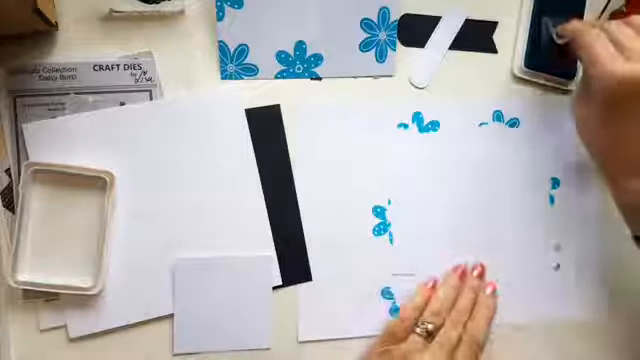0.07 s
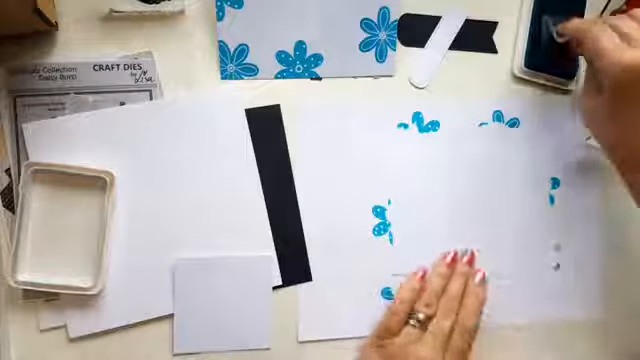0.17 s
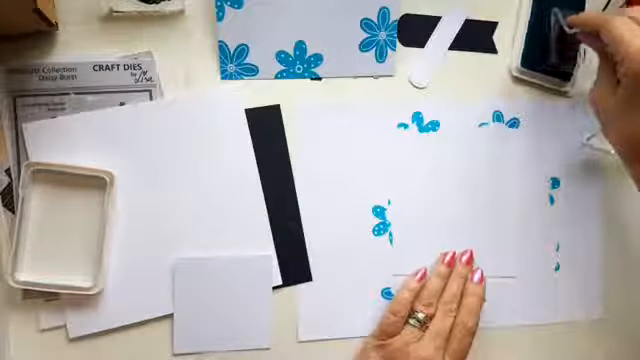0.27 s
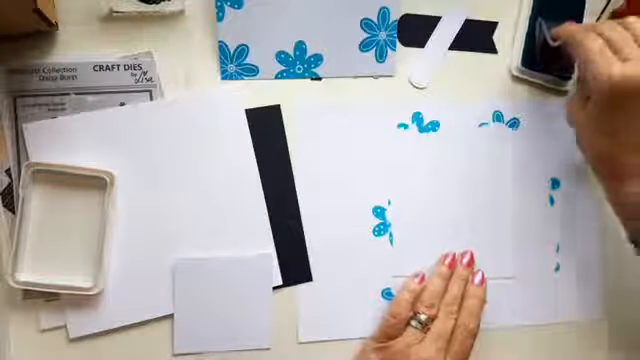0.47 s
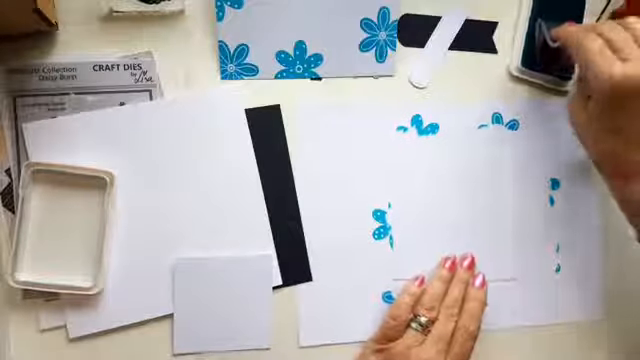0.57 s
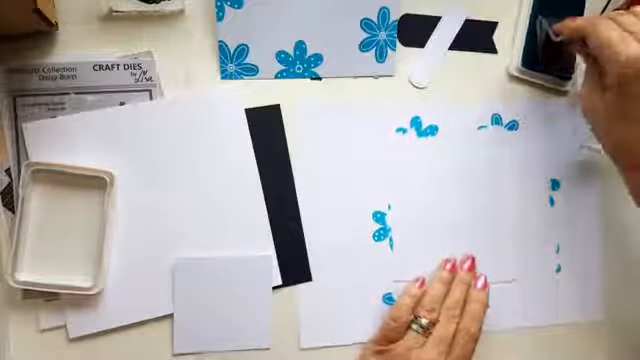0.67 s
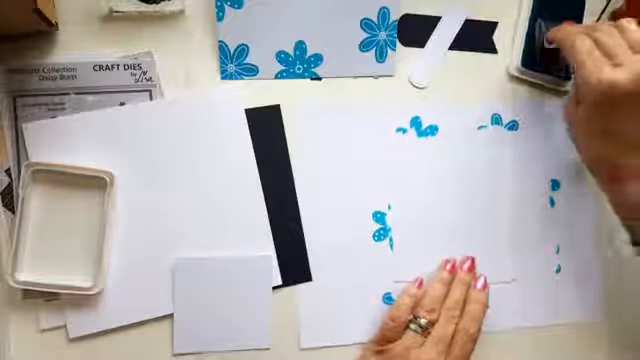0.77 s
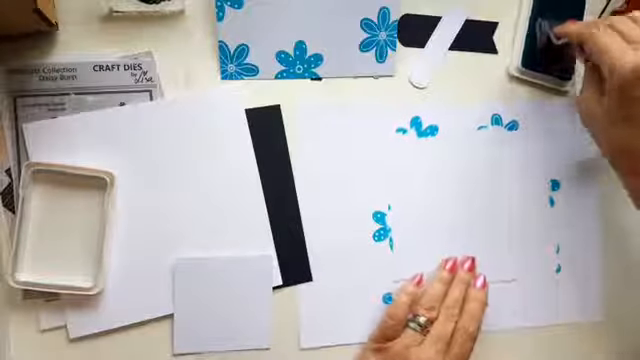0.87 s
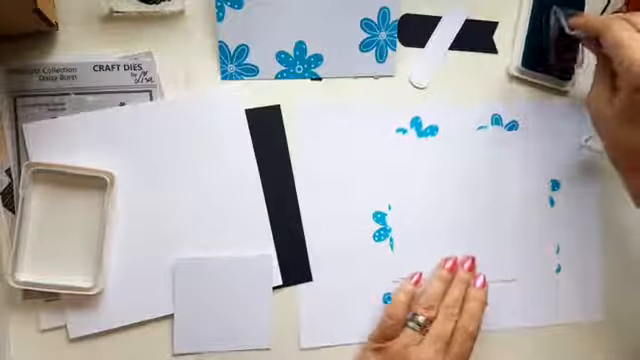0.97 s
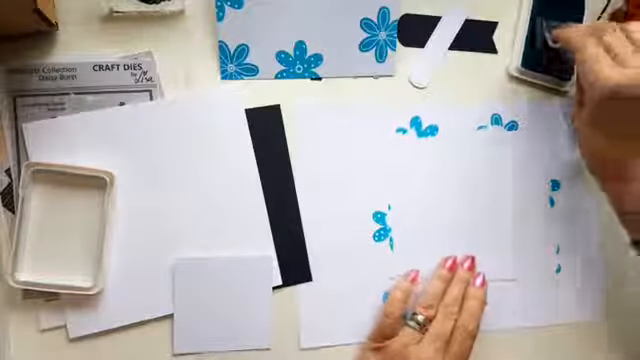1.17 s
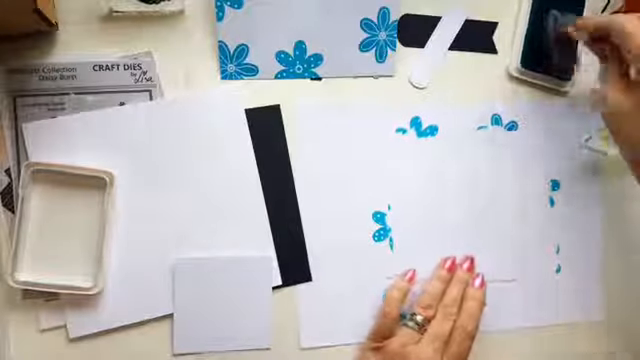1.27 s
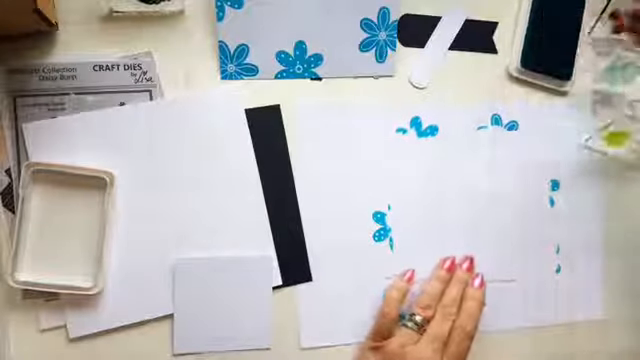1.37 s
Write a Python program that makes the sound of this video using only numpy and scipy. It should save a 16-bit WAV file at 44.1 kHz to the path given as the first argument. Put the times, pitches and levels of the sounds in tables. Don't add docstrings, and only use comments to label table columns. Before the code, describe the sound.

An acrylic stamp block knocks hard on a craft table, then two soft low thuds follow

```python
import sys
import numpy as np
from scipy import signal
from scipy.fft import rfft, irfft
from scipy.io import wavfile
from scipy.ndimage import uniform_filter1d

SR = 44100
rng = np.random.default_rng(int(sys.argv[2]) if len(sys.argv) > 2 else 0)


def inscribe(sig):
    pcm = np.round(np.clip(np.atleast_2d(sig).T, -1, 1) * 32767)
    wavfile.write(sys.argv[1], SR, pcm.astype(np.int16))


def how_loud(loudness_db):
    steps = np.asarray(loudness_db, float) / 20
    return 10 ** steps


N = 61739

# (time [s], crack level [dB], t60 [s])
EDGE_CONTACTS = [
    (.2286, -28, 0.029),
    (.2303, -30.5, 0.026),
    (.2336, -34.5, 0.018),
]


def read(points, hz):
    f, value = np.transpose(points)
    return np.interp(np.log(hz + 1), np.log(f + 1), value)


def evened(x):
    return x / np.sqrt(np.mean(x ** 2) + 1e-20)


def add(mix, s, sound):
    part = mix[round(s * SR):][:len(sound)]
    part += sound[:len(part)]


def coloured(points, size):
    hz = np.fft.rfftfreq(size, 1 / SR)
    spectrum = rfft(rng.standard_normal(size)) * how_loud(read(points, hz))
    return evened(irfft(spectrum, size))


def ring(hz, db, t60, length=.6):
    t = np.arange(round(length * SR)) / SR
    return how_loud(db - 60 * t / t60) * np.sin(2 * np.pi * hz * t)


def motor_bumps():
    per_s, width_s = 69, 0.0047
    at = np.cumsum(rng.uniform(0.36, 1.0, 200)) / per_s * SR
    train = np.zeros(N)
    train[at[at < N].astype(int)] = rng.exponential(1, 200)[at < N]
    u = np.arange(-3, 3, 1 / (width_s * SR / 2))
    pulse = -(1 - u ** 2 / 2) * np.exp(-u ** 2 / 2)
    return how_loud(-70) * signal.oaconvolve(train, pulse, "same")


def fizz():
    hz, width_hz, flicker_db = 7480, 1200, 3.5
    band = [(hz - 2 * width_hz, -40), (hz, 0), (hz + 2 * width_hz, -40)]
    flicker = how_loud(flicker_db * evened(uniform_filter1d(rng.standard_normal(N), size=400)))
    return how_loud(-90) * flicker * coloured(band, N)


def hush():
    # (frequency [Hz], density [dB])
    hush_colour = [(25, -1), (60, -9), (110, -1.5), (200, -3.5), (500, -11), (1500, -16.5), (5000, -26),
                   (9000, -32), (13500, -27.5)]
    return how_loud(-70) * coloured(hush_colour, N) + motor_bumps() + fizz()


def room(x):
    # (frequency [Hz], t60 [s])
    decay = [(200, 0.28), (600, 0.25), (1500, 0.2), (4000, .21), (8000, 0.19), (13000, 0.13)]
    gap_s, spacing = .004, 20
    taps = np.zeros(SR // 2)
    at = np.arange(0, SR // 2 - spacing, spacing)
    taps[at + rng.integers(0, spacing, len(at))] = rng.choice([-1., 1.], len(at))
    hz, t, z = signal.stft(taps, SR, nperseg=256)
    fading = how_loud(-60 * t / read(decay, hz)[:, None])
    tail = signal.istft(z * fading, SR, nperseg=256)[1]
    response = np.concatenate([np.zeros(round(gap_s * SR)), tail / np.linalg.norm(tail)])
    return signal.fftconvolve(x, response)[:N]


def slide():
    # (time [s], level [dB])
    stroke = [(.145, -108), (.165, -68.5), (.19, -69.5), (.2, -68), (.215, -85.5), (.225, -87)]
    # (frequency [Hz], level [dB])
    friction = [(200, 2.5), (1300, 0), (4000, -5.5), (7000, -9), (9500, -9.5), (13500, -9.5)]
    s, db = np.transpose(stroke)
    grain = how_loud(1.2 * evened(uniform_filter1d(rng.standard_normal(N), size=60)))
    return coloured(friction, N) * grain * how_loud(np.interp(np.arange(N) / SR, s, db))


def ticks():
    # (time [s], peak level [dB], resonance [Hz], t60 [s], treble level [dB])
    contacts = [(.1860, -51, 1370, 0.049, -49), (0.1915, -60, 603, 0.036, -37),
                (0.776, -74, 2480, 0.0073, -33), (.9208, -65, 2560, 0.019, -43),
                (.9577, -70.5, 4000, 0.027, -11), (0.999, -63, 3200, 0.037, -17),
                (.9985, -74, 6460, 0.018, -17), (1.2880, -52, 3200, 0.013, -24),
                (1.2882, -60.5, 5200, 0.013, -21), (1.2890, -56.5, 1500, 0.009, -30.5),
                (1.309, -76, 2315, 0.0078, -17), (1.3613, -66, 2500, 0.0084, -24)]
    out = np.zeros(N)
    t = np.arange(2048) / SR
    onset = np.minimum(t / 0.00051, 1)
    for s, db, hz, t60, treble_db in contacts:
        resonance = [(hz / 4, -20), (hz / 1.5, -6), (hz, 0), (hz * 1.2, -9), (14000, treble_db)]
        add(out, s, onset * how_loud(db - 60 * t / t60) * coloured(resonance, size=2048))
    return out


def whistle():
    hz, end_s = 14300, .61
    start_s = EDGE_CONTACTS[0][0]
    out = np.zeros(N)
    add(out, start_s, ring(hz, -87, 6.6, length=end_s - start_s))
    add(out, start_s, ring(hz, -63.5, .05))
    return out


def slaps():
    slap_times = [
        .1850,
        .2243,
        .3440,
        .9966,
    ]
    # (level [dB], puff level [dB])
    slap_levels = [(-61.5, -8), (-43.5, -4), (-57.5, -0.5), (-51, -6)]
    # (frequency [Hz], level [dB], t60 [s])
    card_modes = [(373, 6.5, 0.044), (450, -7, .07), (624, 1, 0.06), (702, -3.5, .07), (773, -16.5, 0.054),
                  (972, 0, 0.042), (1142, 1.5, 0.056), (1318, -7.5, 0.052), (1414, -5.5, 0.043)]
    # (frequency [Hz], level [dB])
    air = [(300, -13), (900, -0.5), (1600, -3), (2300, -7), (4000, -22.5), (8000, -28.5)]
    out = np.zeros(N)
    t = np.arange(4096) / SR
    onset = np.minimum(t / 0.00039, 1)
    for s, (db, puff_db) in zip(slap_times, slap_levels):
        signs = rng.choice([-1., 1.], len(card_modes))
        modes = sum(sign * ring(hz, db + mode_db, t60, length=4096 / SR)
                    for sign, (hz, mode_db, t60) in zip(signs, card_modes))
        puff = coloured(air, size=4096) * how_loud(db + puff_db - 60 * t / 0.044)
        add(out, s, onset * (modes + puff))
    return out


def knocks():
    block_hz = [294, 385, 432, 620, 770, 945, 1250, 1520, 1790, 2050, 2440, 3600, 4250, 4980]
    # (level [dB], t60 [s])
    block_decay = [(-1, 0.046), (-14.5, 0.077), (-1, 0.029), (-10, 0.031), (-2, 0.02), (-4.5, .05),
                   (-10.5, 0.048), (3, 0.02), (-8, 0.029), (-5, 0.027), (-5.5, 0.036), (-4, 0.015),
                   (-13, .03), (-15.5, .03)]
    # (frequency [Hz], level [dB])
    crack = [(300, -36), (1500, -1.5), (3000, -5.5), (6000, -17.5), (8500, -25), (12500, -32.5),
             (14200, -32)]
    strike_s, rise_s, strike_db = .2285, .0015, -25
    out = np.zeros(N)
    t = np.arange(8192) / SR
    modes = sum((-1) ** k * ring(hz, strike_db + db, t60, length=8192 / SR)
                for k, (hz, (db, t60)) in enumerate(zip(block_hz, block_decay)))
    add(out, strike_s, np.minimum(t / rise_s, 1) * modes)
    onset = np.minimum(t / 0.00066, 1)
    for s, db, t60 in EDGE_CONTACTS:
        add(out, s, onset * coloured(crack, size=8192) * how_loud(db - 60 * t / t60))
    return out


def thuds():
    # (time [s], level [dB], upper-mode level [dB])
    presses = [
        (.3440, 0, 0),
        (.9969, .7, 1.1),
        (.2300, -13, -6),
        (.845, -30, 8),
        (.176, -30, 4),
    ]
    # (frequency [Hz], level [dB], t60 [s], swing direction under the hand [+1 or -1])
    table_modes = [(48, -50, .4, -1), (67, -54, .6, -1), (91.7, -44.6, .42, -1), (104.1, -24.1, .126, 1),
                   (115.4, -18.7, .12, -1), (117.4, -23.9, .222, 1)]
    # (frequency [Hz], level [dB], t60 [s], swing direction [+1 or -1])
    upper_modes = [(177, -52.7, .3, -1), (220, -45.5, .08, -1), (295, -45.9, .11, -1),
                   (316, -51.5, .18, -1), (389, -50.8, .14, -1)]
    contact_s = .0008
    low, high = np.zeros(N), np.zeros(N)
    push = np.sin(np.pi * np.arange(0, 1, 1 / (contact_s * SR)))
    push = push / push.sum()
    low_ring = sum(swing * ring(hz, db, t60) for hz, db, t60, swing in table_modes)
    high_ring = sum(swing * ring(hz, db, t60) for hz, db, t60, swing in upper_modes)
    for s, db, upper_db in presses:
        start_s = s - contact_s / 2
        add(low, start_s, np.convolve(how_loud(db) * push, low_ring))
        add(high, start_s, np.convolve(how_loud(db + upper_db) * push, high_ring))
    return low, high


def scene():
    low, high = thuds()
    sharp = knocks() + ticks() + slaps()
    reflected = room(how_loud(-5.5) * sharp + how_loud(-9) * high)
    return (low + high + sharp + reflected + slide() + whistle() + hush())[None]


def band_limit(x):
    return signal.sosfilt(signal.butter(12, 15590, fs=SR, output="sos"), x)


def record(dry):
    hz = np.fft.rfftfreq(N, 1 / SR)
    shelf_db = -18.5 * np.clip((hz - 14200) / 250, 0, 1)
    notch_db = -2.5 * np.exp(-((hz - 9070) / 430) ** 2)
    cut = signal.lfilter(*signal.butter(2, 56, "high", fs=SR), dry)
    mix = irfft(rfft(cut) * how_loud(shelf_db + notch_db), N) - .0003
    return band_limit(mix)


dry = scene()
out = record(dry)
inscribe(out)
```